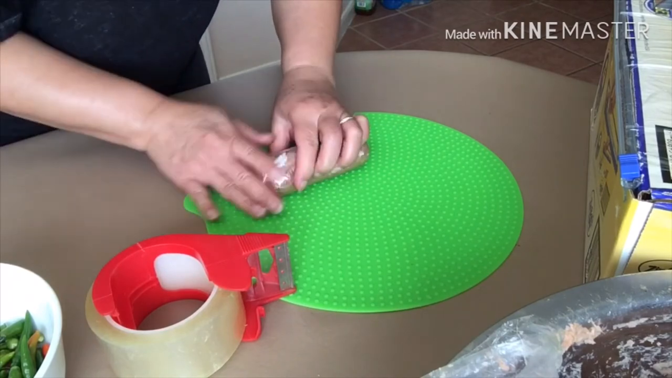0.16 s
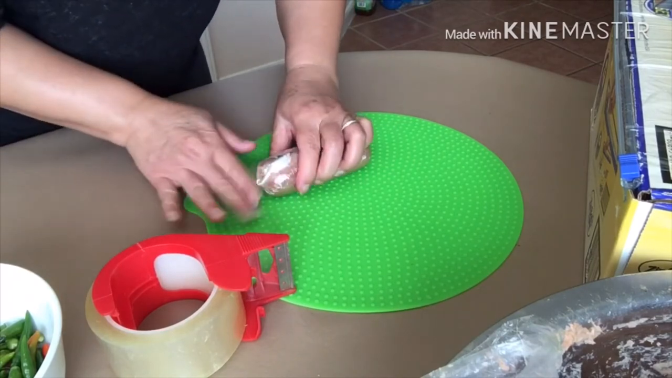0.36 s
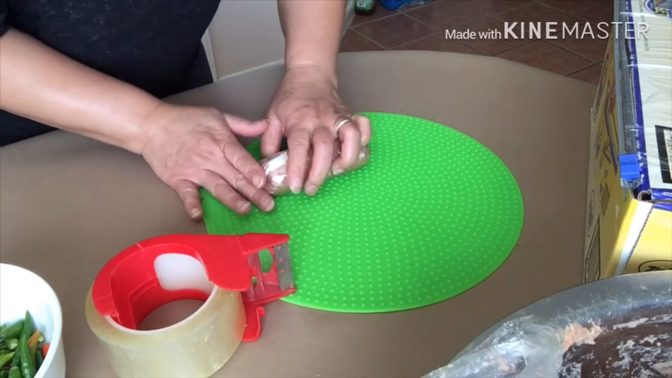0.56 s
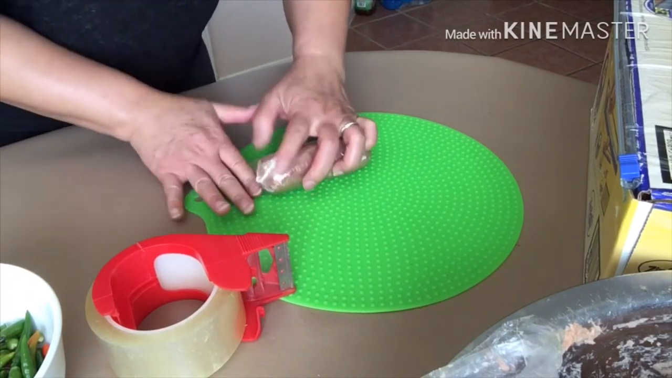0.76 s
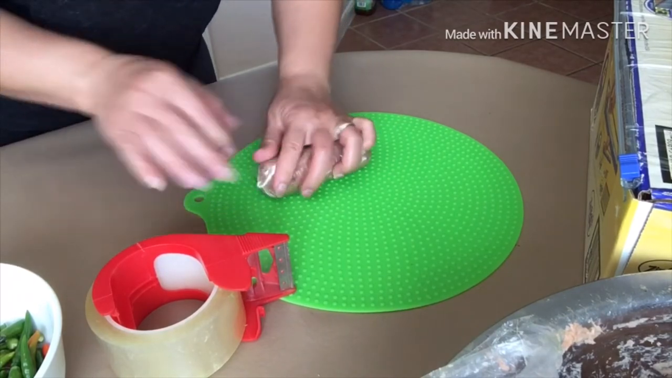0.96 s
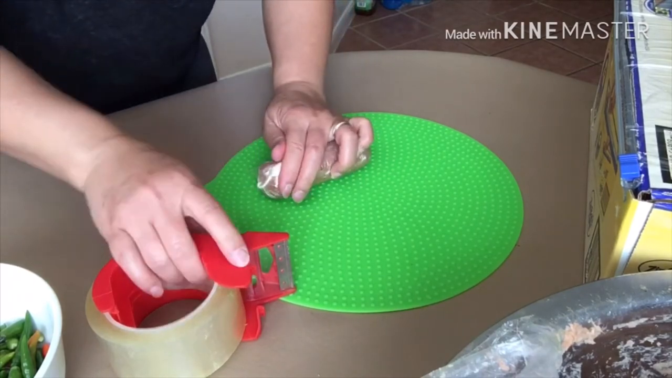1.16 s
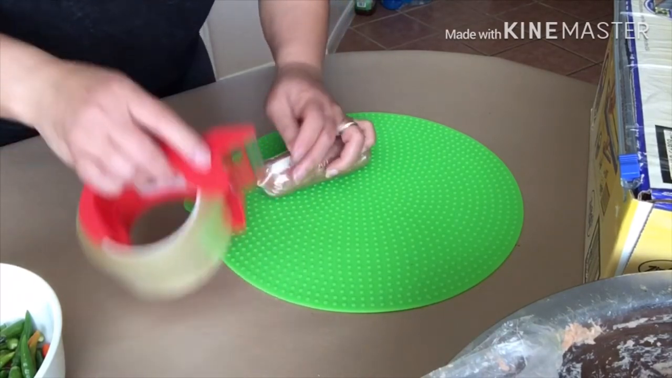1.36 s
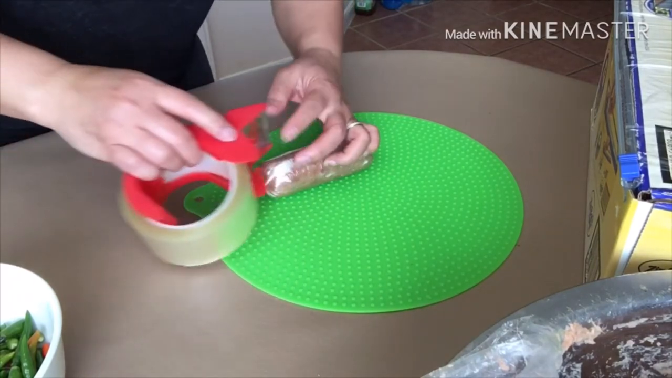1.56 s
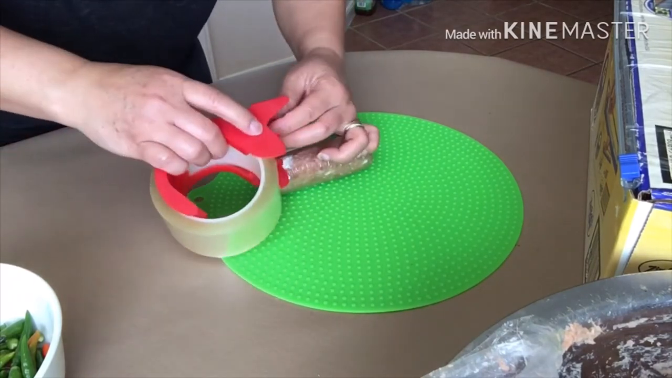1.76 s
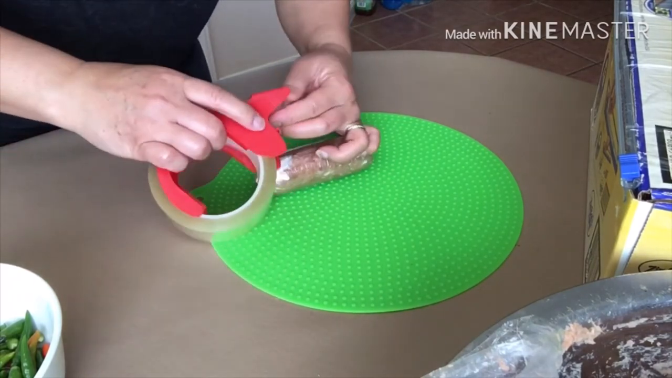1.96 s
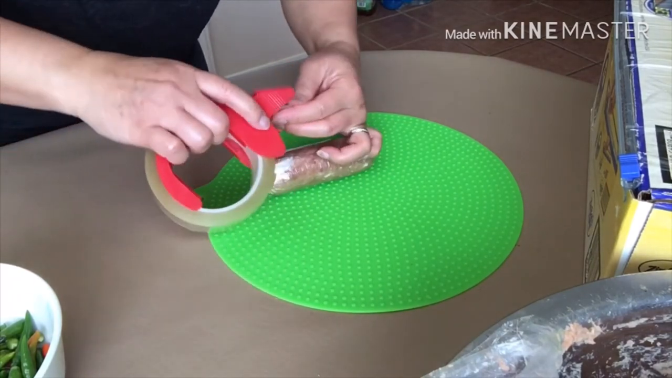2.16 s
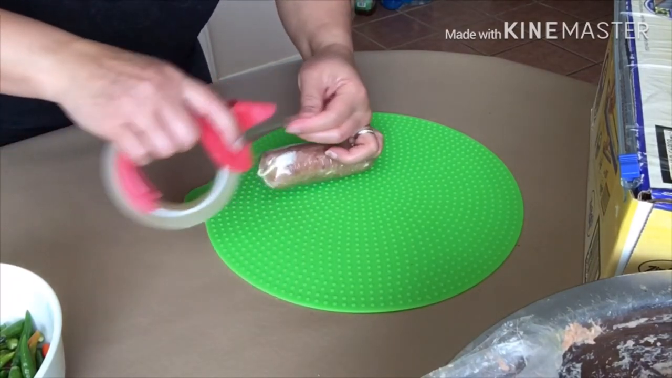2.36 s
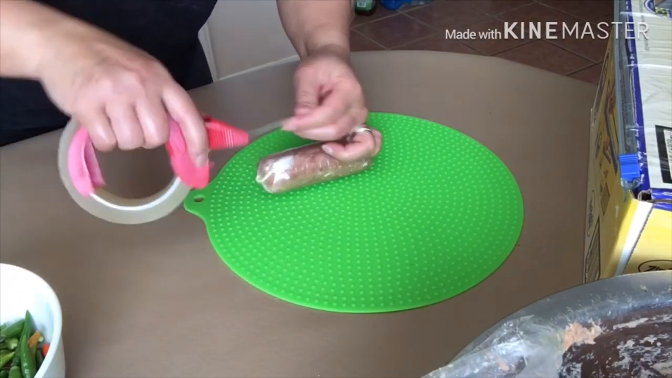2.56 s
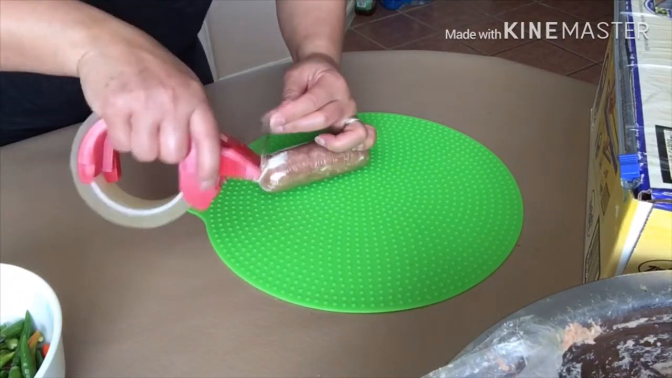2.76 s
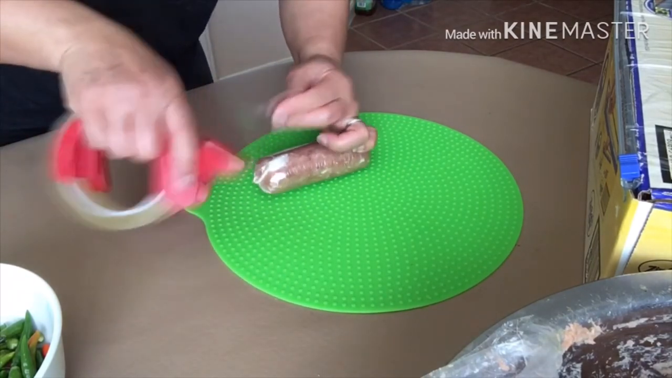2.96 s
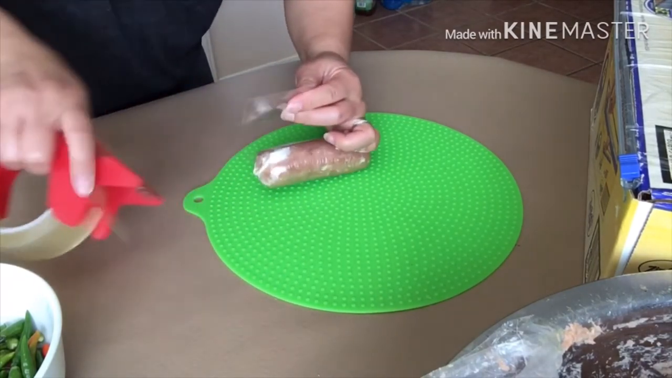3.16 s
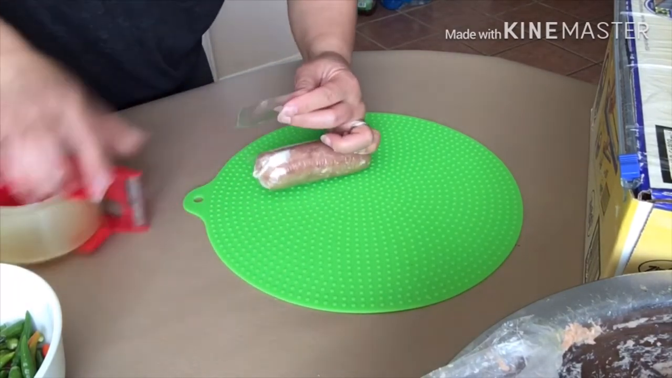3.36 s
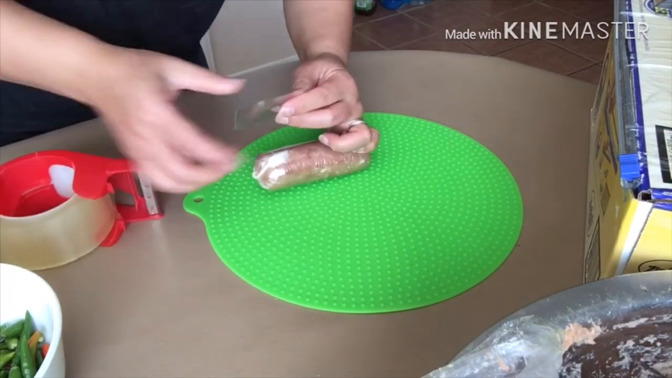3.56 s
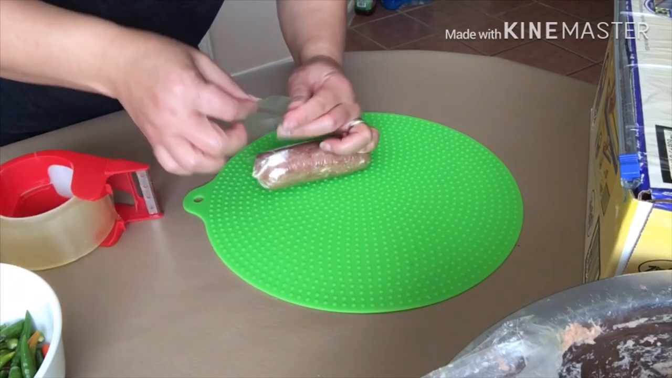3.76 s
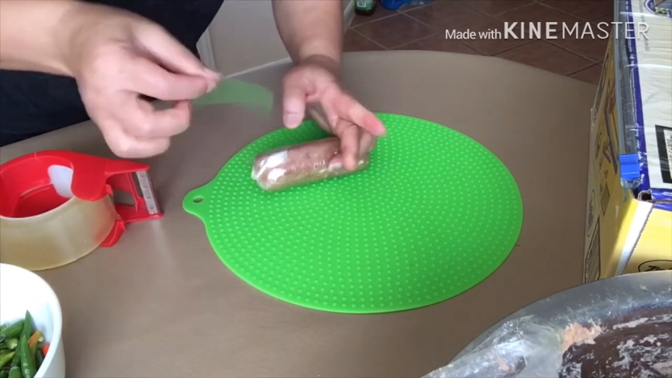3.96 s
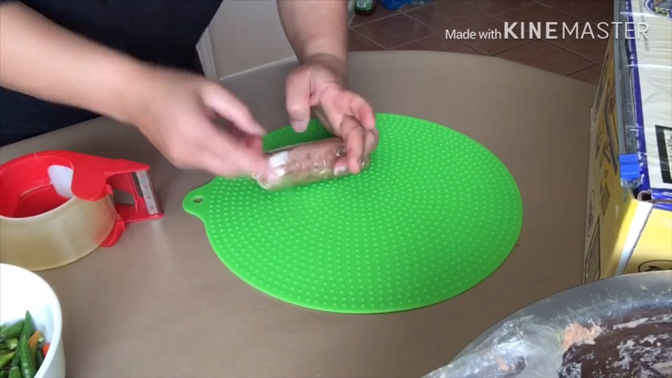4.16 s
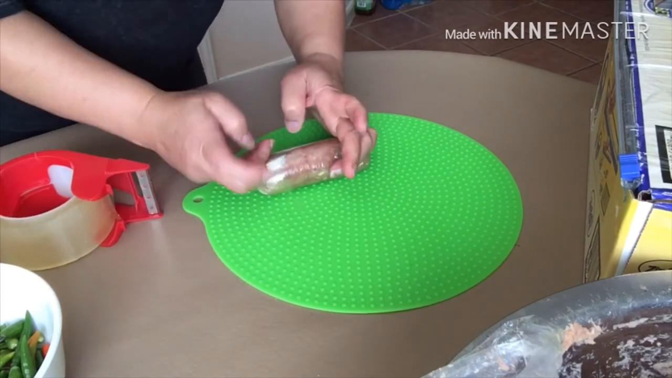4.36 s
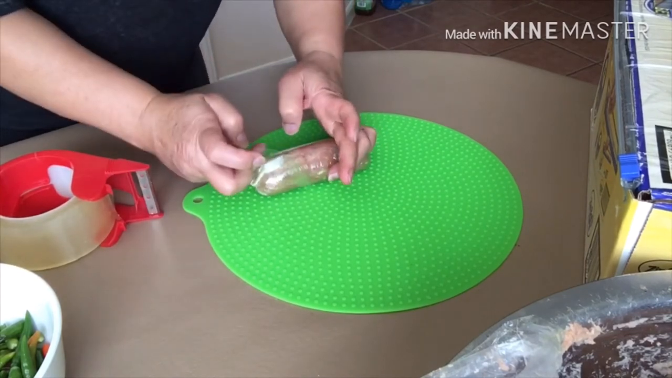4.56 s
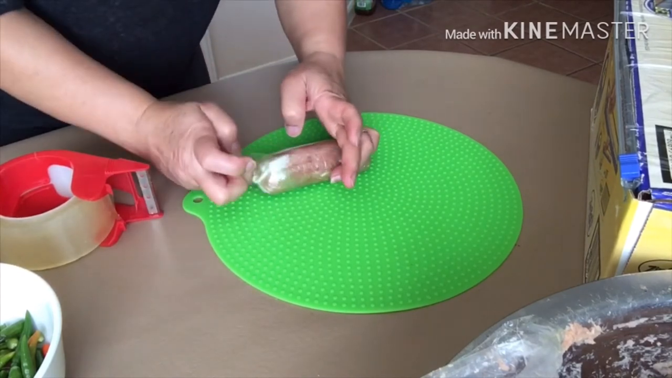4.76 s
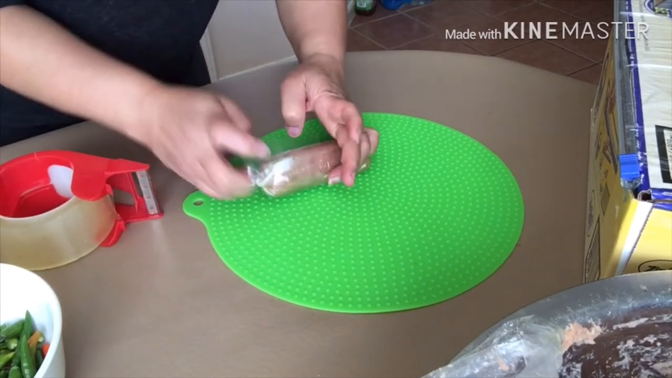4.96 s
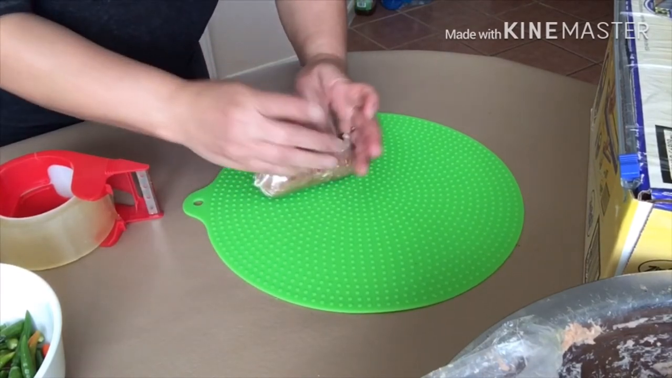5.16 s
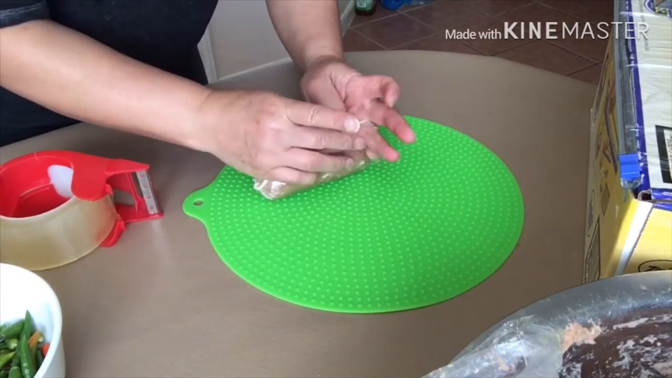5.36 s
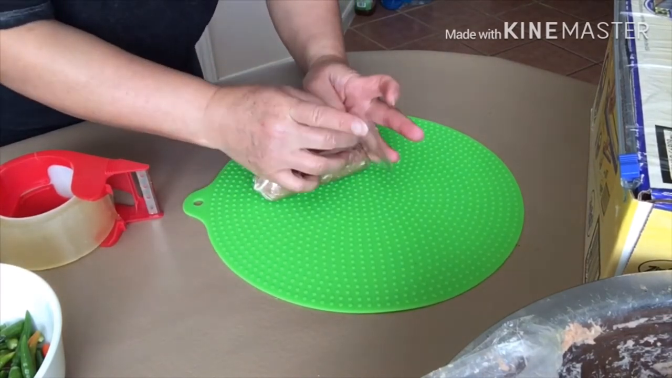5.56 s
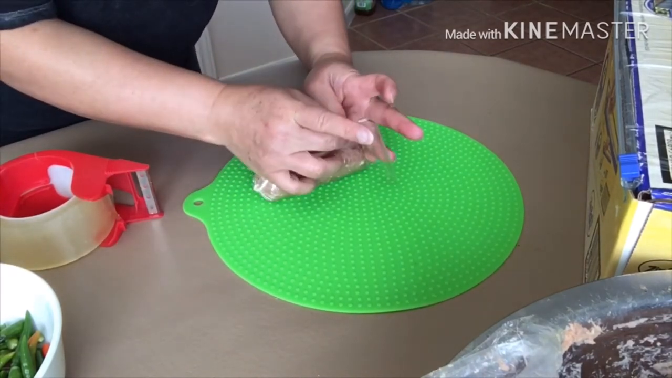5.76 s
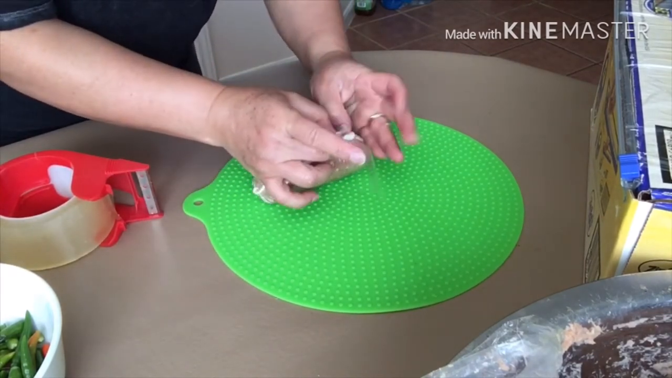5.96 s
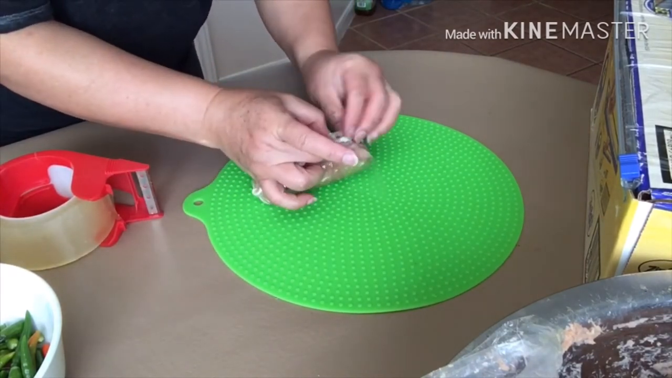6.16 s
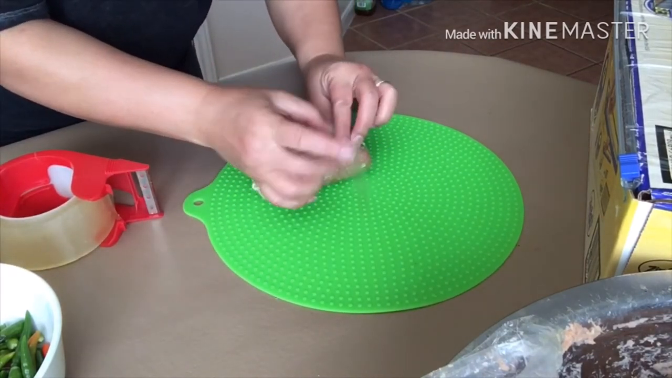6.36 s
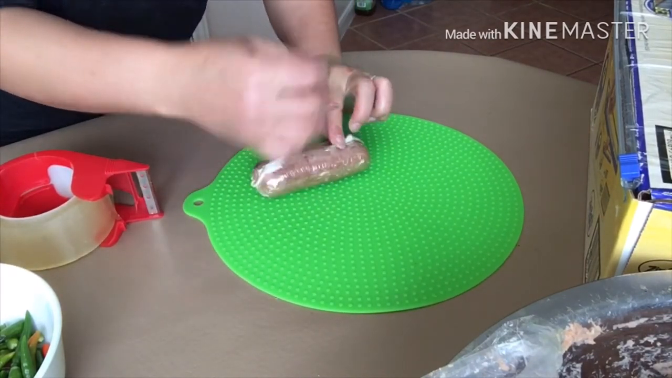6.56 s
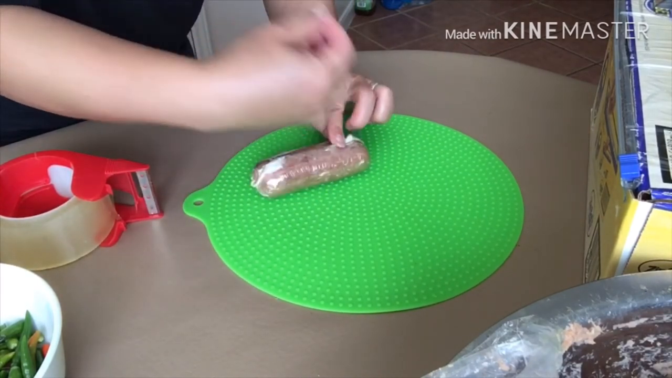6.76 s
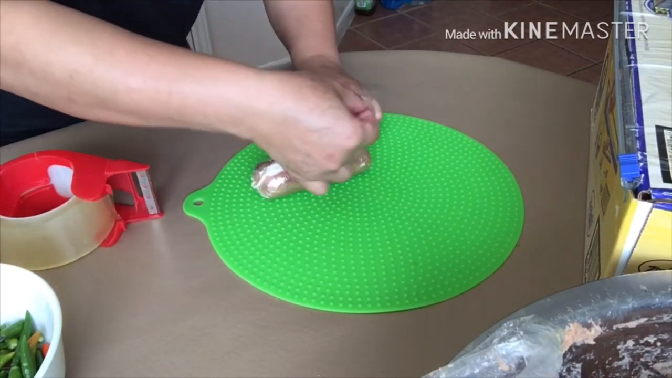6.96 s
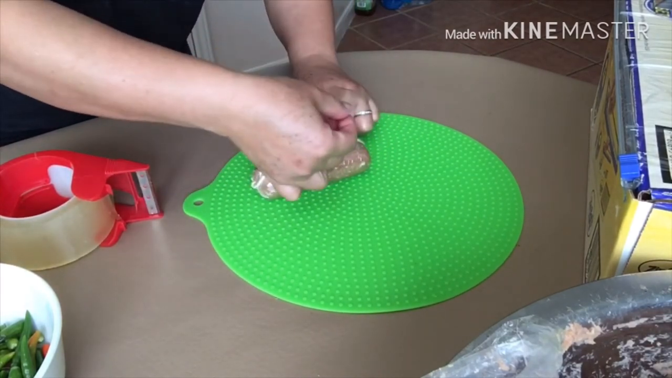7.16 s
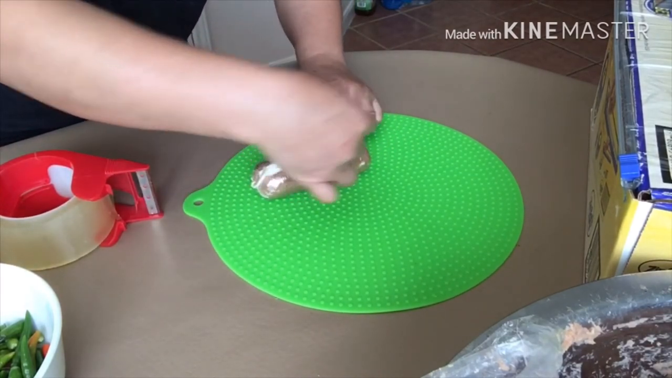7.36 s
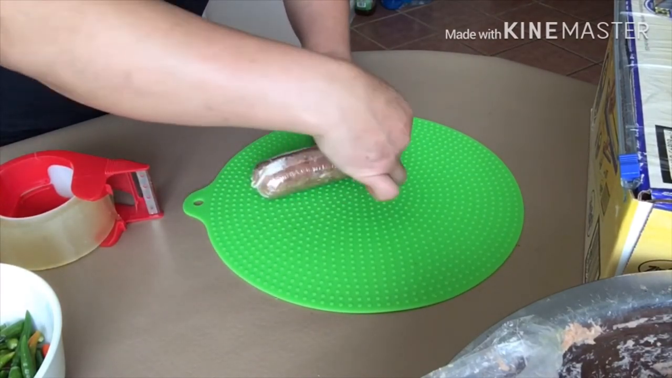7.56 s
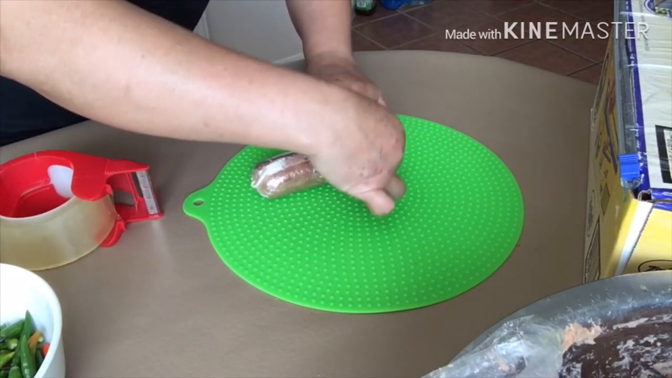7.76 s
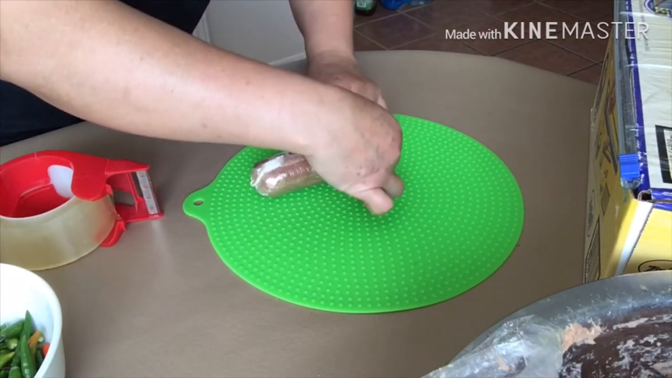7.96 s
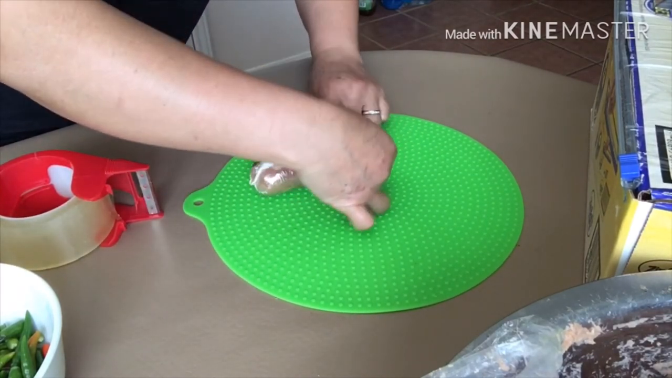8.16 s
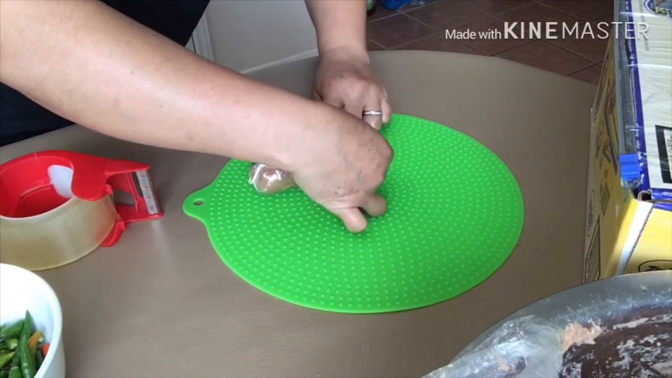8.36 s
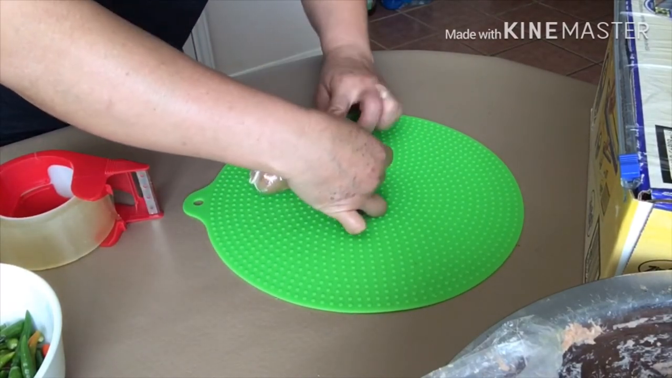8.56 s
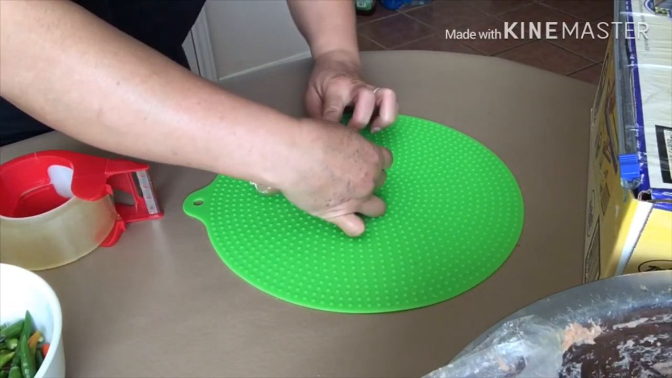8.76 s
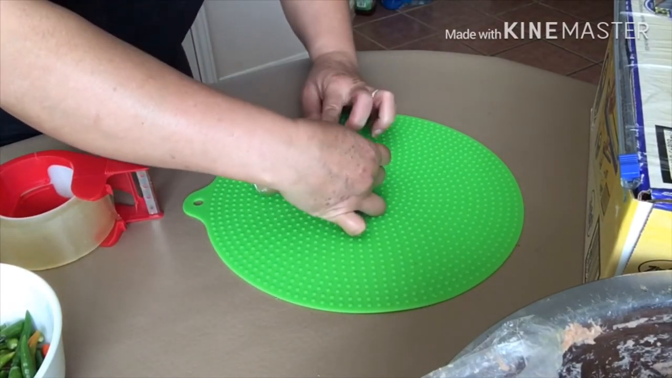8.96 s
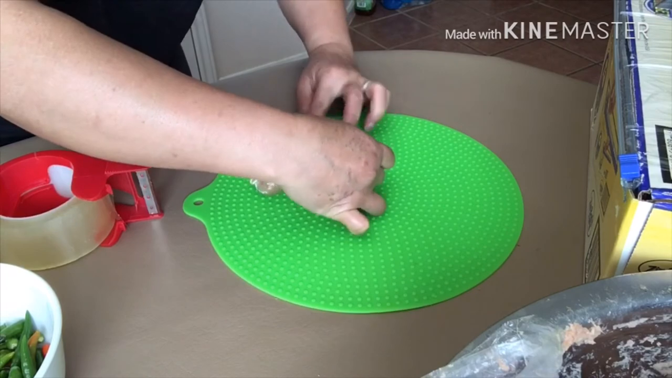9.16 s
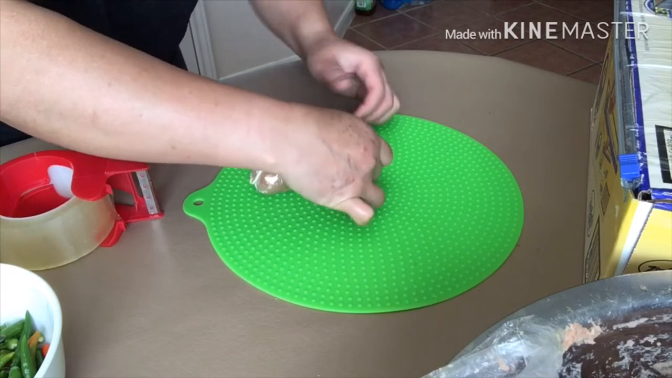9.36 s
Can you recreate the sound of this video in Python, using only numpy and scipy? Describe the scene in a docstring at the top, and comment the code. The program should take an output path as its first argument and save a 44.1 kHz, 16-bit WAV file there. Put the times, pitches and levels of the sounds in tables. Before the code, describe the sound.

Over a low household rumble, thin film pops lightly and is softly tapped. Loud stuttering tape peels burst out, bright and dry, ending in hard snaps. A plastic dispenser thumps on the tabletop, the loose strip crackles sharply, and then light irregular crinkling continues with near-quiet gaps and a busier patch at the end. Closely miked, with a brief room ring.

```python
"""Tape pulled and cut over plastic wrap

Hands smooth plastic wrap on a kitchen table, lift a tape dispenser, pull tape off the roll in
stick-slip jerks, cut it on the teeth, set the dispenser down and stick the strip on the wrap.
Slips and creases are filtered random clicks, blows are sums of dying modes, and the fine rustle
is filtered noise. A small hard room rings shortly behind each crack, over a low household rumble."""
import sys
import numpy as np
from scipy import signal
from scipy.io import wavfile
from scipy.ndimage import uniform_filter1d

SR = 44100
rng = np.random.default_rng(int(sys.argv[2]) if len(sys.argv) > 2 else 0)


def store_pcm(level_fs):
    """Save levels as 16-bit WAV."""
    pcm = np.round(np.clip(level_fs, -1, 1) * 32767).astype(np.int16)
    wavfile.write(sys.argv[1], SR, np.atleast_2d(pcm).T)


N = 415863
HZ = np.fft.rfftfreq(4096, 1 / SR)  # bins on which filter gains are given
LEAD_S = .002  # build-up before a snap

# Fine crackle and rustle throughout, including the dying room tail after the tape pulls and the hard blow.
# Each row: time in seconds, level in dB, gain above about 6 kHz in dB.
FINE_RUSTLE = [(0.0, -59, 4), (0.47, -66.5, 4.5), (1.43, -58.5, -3), (1.56, -72, 3), (1.85, -67, -3),
               (2.23, -49, -2.5), (2.92, -47, -2.5), (3.17, -54.5, 0), (3.37, -54.5, -4), (3.5, -34.5, -5),
               (3.67, -57, -4), (4.15, -59.5, -5), (4.59, -74.5, 4.5), (4.79, -68, 4), (5.18, -65.5, 0),
               (6.15, -74.5, 1), (6.45, -73, 10.5), (7.04, -81, -26), (7.7, -77, -6), (8.01, -67.5, -3),
               (8.6, -72.5, -1.5), (8.78, -64.5, -4), (9.1, -58.5, -0.5), (9.43, -64.5, 2)]


def gain_of(db):
    """Amplitude ratio: 20 dB is a factor of ten."""
    return 10 ** (np.asarray(db) / 20)


def evened(x):
    """Normalisation by signal power: scales to rms 1."""
    return x / np.sqrt(np.mean(x ** 2) + 1e-20)


def read(points, hz):
    """Spectral interpolation: reads a (frequency, value) table along log frequency."""
    f, value = np.transpose(points)
    return np.interp(np.log(hz + 1), np.log(f + 1), value)


def add(mix, s, sound):
    """Superposition: mixes a sound in at time s."""
    part = mix[round(s * SR):][:len(sound)]
    part += sound[:len(part)]


def colour(x, db):
    """Minimum-phase filtering: the phase is the Hilbert transform of the log gain on the HZ bins."""
    log_gain = np.log(gain_of(np.maximum(db, -100)))
    both_sides = np.concatenate([log_gain, log_gain[-2:0:-1]])
    spectrum = np.exp(np.conj(signal.hilbert(both_sides)))
    taps = np.fft.ifft(spectrum).real[:1024]
    return signal.oaconvolve(x, taps)[:len(x)]


def clicks(length, per_s, spread_db):
    """Random impulse process: clicks of either sign at chance moments; a few are large."""
    chance, side = rng.random((2, length))
    size = gain_of(spread_db * np.minimum(rng.exponential(1, length), 4))
    return size * np.sign(side - .5) * (chance < per_s / SR)


def pull(rows):
    """Stick-slip: the glue lets go thousands of times a second, in clumps, and drums on the taut strip."""
    # Adhesive rasp. Each row: frequency in Hz, relative level in dB per Hz.
    peel_spectrum = [(88, -49), (150, -18), (457, -6), (1120, -13.5), (1760, -2), (2650, -6.5), (2980, -12),
                     (3550, -5), (6020, -3), (10600, -14), (13700, -13.5), (16000, -23.5)]
    strip_hz, strip_width_hz = 3110, 400
    s, level_db, drum_db = np.transpose(rows)
    t = np.arange(s[0], s[-1], 1 / SR)
    clumps = evened(uniform_filter1d(rng.standard_normal(len(t)), 90))
    slips = clicks(len(t), 4100, 1.0) * gain_of(2.5 * clumps)
    rasp = evened(colour(slips, read(peel_spectrum, HZ)))

    # the taut strip is a two-pole resonator driven by the same slips
    r = np.exp(-np.pi * strip_width_hz / SR)
    poles = [1, -2 * r * np.cos(2 * np.pi * strip_hz / SR), r * r]
    drum = evened(signal.lfilter([1, 0, -1], poles, slips))
    sound = rasp + gain_of(np.interp(t, s, drum_db)) * drum

    onset, release = (t - s[0]) / 0.0014, (s[-1] - t) / 0.0029  # ramps in s
    ends = np.minimum(np.minimum(onset, release), 1)
    return s[0], gain_of(np.interp(t, s, level_db)) * evened(sound) * ends


def jerk(start, length, start_db, end_db, drum_db):
    """Driven friction: the level slides while the hand drags, then the glue grips again."""
    let_go_s, let_go_db = .008, -12
    end = start + length
    return pull([(start, start_db, drum_db),
                 (end, end_db, drum_db),
                 (end + let_go_s, end_db + let_go_db, drum_db)])


def pulls():
    """Intermittent adhesion: the tape comes unstuck in separate jerks."""
    # Jerks of the tape. Each row: start in seconds, length in seconds, level at start in dB,
    # level at end in dB, drumming of the taut strip relative to the rasp in dB.
    tape_jerks = [(2.37, .017, -14.5, -16, -3), (2.41, .012, -16, -17.5, -4), (2.423, .014, -12, -11.5, -1),
                  (2.436, 0.038, -18, -16, -5.5), (2.487, 0.045, -14.5, -17, -5.5),
                  (2.784, .05, -33, -34.5, -6), (2.84, 0.036, -21.5, -27.5, -1.5),
                  (2.871, .035, -17.5, -32, -6), (3.859, 0.069, -45.5, -37.5, -11),
                  (3.932, .03, -44.5, -21.5, -17), (3.965, .012, -22.5, -39.5, -19)]
    out = np.zeros(N)
    for row in tape_jerks:
        add(out, *jerk(*row))
    return out


def snap(db, hz, treble_db, low_db, t60, width=.5, lift_db=8):
    """Impulsive release: a quick build-up, one sharp release and a dying swarm, brightest where the film rings."""
    t = np.arange(3000) / SR - LEAD_S
    shape = np.where(t < 0, gain_of(11000 * t), gain_of(-60 * t / t60))
    slips = evened(clicks(3000, 8000, 3))
    swarm = .45 * slips * shape
    swarm[round(LEAD_S * SR)] = 2.8  # the sharp release

    slope = read([(200, low_db - 11.5), (800, low_db), (1800, -5), (6500, 1.5 + 0.41 * treble_db),
                  (11500, treble_db), (16000, treble_db - 4)], HZ)
    peak_db = lift_db + 2.2 * np.log2(4000 / hz)  # large slack panels ring lower and purer
    octaves_off = np.log2((HZ + 1) / hz)
    resonance = peak_db * np.exp(-(octaves_off / width) ** 2)
    sound = colour(swarm, slope + resonance)
    envelope = abs(signal.hilbert(sound))
    return gain_of(db) * sound / envelope.max()


def snaps(rows, low_db, t60):
    """Size and pitch: the higher a snap rings, the thinner it is; low_db holds for one ringing at 4 kHz."""
    low_db_per_octave = -6  # small tight creases ring high and thin
    out = np.zeros(N)
    for s, db, hz, treble_db in rows:
        octaves = np.log2(hz / 4000)
        add(out, s - LEAD_S, snap(db, hz, treble_db, low_db + low_db_per_octave * octaves, t60))
    return out


def cracks():
    """Sudden release of stored strain: single slips of the glue, cutter teeth and dispenser clicks."""
    # Single cracks. Each row: time in seconds, peak level in dB, brightest frequency in Hz,
    # spectral level at 11.5 kHz in dB.
    crack_events = [(1.7548, -41, 2720, -33), (1.8084, -36, 2750, -19), (1.8138, -30, 3600, -37),
                    (1.8537, -36, 1520, -31), (1.9222, -24, 8300, -4), (1.9272, -32.5, 4600, -24),
                    (2.0152, -27.5, 3053, -8.5), (2.0242, -21, 3100, -15.5), (2.0284, -14.5, 4060, -15.5),
                    (2.0948, -7, 6223, -10.5), (2.12, -15, 3140, -20), (2.1287, -25, 1938, -25),
                    (2.1769, -3, 2956, -12.5), (2.2189, -2.5, 6140, -14.5), (2.3668, -23, 3074, -20),
                    (2.3719, -1, 3168, -16), (2.4106, -3, 7274, -8.5), (2.4153, -2, 4910, -7.5),
                    (2.4172, -3, 6764, -9.5), (2.4224, -0.5, 3077, -14), (2.6426, -21.5, 2744, -16),
                    (2.667, -27.5, 6500, -24.5), (2.696, -31.5, 3503, -13.5), (2.704, -29.5, 900, -26),
                    (2.7502, 0, 3800, -12.5), (2.754, -2.5, 3940, -12.5), (2.7607, 3, 3678, -14.5),
                    (2.7647, 1.5, 3657, -17.5), (2.7669, -6, 3767, -16), (2.7731, -1, 3920, -11),
                    (3.065, -26, 3496, -27.5), (3.0734, -1, 3656, -19), (3.0771, -3.5, 3754, -17),
                    (3.1029, -19, 3630, -21), (3.2694, -20.5, 6240, -12.5), (3.2944, -24.5, 7060, -3),
                    (3.2982, -17, 3620, -11.5), (3.3008, -18, 4180, -15.5), (3.3148, -24, 3605, -19),
                    (3.3751, -14.5, 3200, -29), (3.3777, -12, 3290, -26), (3.381, -12.5, 3360, -22.5),
                    (3.3854, -11.5, 2383, -22.5), (3.3878, -13.5, 2437, -22), (3.4125, -13.5, 5950, -23.5),
                    (3.426, -14, 1163, -22), (3.4313, -1.5, 3300, -18), (3.4499, -10.5, 3230, -20),
                    (3.5326, -14.5, 2920, -25), (3.5392, -16, 1184, -23), (3.6441, -28, 2300, -18),
                    (3.6731, -24, 1100, -16), (3.7873, -30.5, 3500, -16), (3.8378, -27.5, 2590, -21.5),
                    (3.8484, -22, 2976, -16), (3.8628, -16, 3000, -11), (3.918, -36, 3800, -18),
                    (3.9463, -12, 2410, -6), (3.9558, -7, 5230, -17), (3.9607, -2, 3073, -4.5),
                    (3.9712, -7, 2200, -17.5)]
    return snaps(crack_events, low_db=-12, t60=.028)


def ticks():
    """Random weak events: faint creases at chance moments, their level following the rustle up to a cap."""
    count, over_db, range_db, cap_db = 45, 19, 6, -60
    when, pitch, size, shine = rng.random((count, 4)).T
    s = .01 + when * (N / SR - .02)
    rustle_db = np.interp(s, *np.transpose(FINE_RUSTLE)[:2])
    db = np.minimum(rustle_db, cap_db) + over_db + range_db * size
    return zip(s, db, 3000 * 2.5 ** pitch, -14 + 14 * shine)


def creases():
    """Snap-through buckling: creases of the plastic wrap pop, with faint chance ticks among them."""
    # Popping creases. Each row: time in seconds, peak level in dB, brightest frequency in Hz,
    # spectral level at 11.5 kHz in dB.
    crease_events = [(.0826, -32, 3550, -30.5), (.1117, -41, 2910, -27), (.1728, -23, 3530, -13),
                     (.1909, -21, 4000, 0), (.2751, -14.5, 3060, -12), (.3082, -24, 5930, -11),
                     (.391, -21.5, 3700, -11), (.4554, -26.5, 3640, -2), (.4838, -30, 4350, 2),
                     (.5187, -42, 6760, -20), (.5794, -20.5, 3700, -9.5), (.657, -32, 920, -30),
                     (.7196, -37, 5900, 1), (.8148, -40, 1840, -41), (.8746, -17, 2670, -15),
                     (.9254, -39, 3850, -13), (.9864, -22, 5800, -6), (.9904, -21.5, 5750, -21),
                     (.9956, -18, 2450, -17), (1.2299, -34, 2030, -31), (1.2809, -28, 1920, -18),
                     (1.3466, -16.5, 1850, -20.5), (1.3739, -26.5, 3640, -15), (1.5247, -42, 5810, -10),
                     (1.5742, -37, 5470, -21), (4.0909, -27, 3920, -26), (4.1556, -38.5, 1900, -36),
                     (4.2208, -32, 4240, -58), (4.3641, -42, 5940, -14), (4.4191, -33, 6040, -16),
                     (4.4479, -25.5, 4470, -14), (4.5692, -38, 6050, 10), (4.7063, -13.5, 6320, 3),
                     (4.715, -32, 6400, 3), (4.771, -21, 8980, 0), (4.8876, -36.5, 934, -49),
                     (4.9376, -29.5, 2800, -18), (5.0837, -24, 3300, 1), (5.1155, -37.5, 6890, 3),
                     (5.2031, -38.5, 3040, -45), (5.2495, -38, 3660, 2), (5.2942, -24.5, 5800, -19),
                     (5.4264, -41, 5840, -10), (5.5178, -40, 5550, -14), (5.7741, -33, 4280, -4),
                     (5.9538, -37.5, 7170, -11), (6.1856, -40.5, 7080, 0), (6.3346, -37, 3560, -4),
                     (6.4629, -34, 5900, -1), (6.5093, -34, 3290, -9), (6.5166, -23, 3080, -7),
                     (6.6066, -42.5, 7300, -12), (6.6826, -33, 4580, -26), (6.6903, -37.5, 2500, -42),
                     (6.6975, -26.5, 4400, -31), (6.8646, -34.5, 4000, -42), (6.9021, -32, 1080, -35.5),
                     (6.9644, -44, 1645, -31.5), (7.3817, -45, 5230, -15), (7.9046, -35.5, 2650, -44),
                     (7.9144, -38, 3850, -19), (7.9526, -27.5, 1310, -25), (8.1961, -23, 5900, -17),
                     (8.218, -27, 1100, -19), (8.2371, -30.5, 5920, -25), (8.2585, -37.5, 1340, -21),
                     (8.3417, -35, 6050, -14), (8.3724, -42, 5990, -11), (8.5213, -45, 6460, -20),
                     (8.6544, -39, 6100, -10), (8.6611, -35, 7330, -3), (8.7098, -41, 5970, -15),
                     (8.786, -42, 7030, -7), (8.8322, -29.5, 7470, -10), (8.8527, -21.5, 4460, -20),
                     (8.8873, -23, 8860, -18), (8.9553, -30, 1370, -21), (8.9829, -32.5, 1430, -24),
                     (8.9939, -23, 4200, -20), (9.0187, -19, 1530, -8), (9.1071, -16, 1830, -17.5),
                     (9.1158, -35, 5230, -23), (9.1241, -22.5, 5920, -8), (9.173, -25, 5920, -25),
                     (9.1772, -19.5, 1190, -20), (9.1982, -26.5, 1370, -37), (9.2515, -29.5, 1260, -45),
                     (9.3351, -35, 1160, -47)]
    return snaps([*crease_events, *ticks()], low_db=-18.5, t60=.019)


def crinkle(rows, per_s, slide, patchy_db):
    """Crackling noise: short puffs, each in its own band, over an unevenly drifting rustle."""
    # Rustling film. Each row: frequency in Hz, gain in dB.
    film_spectrum = [(290, -46), (500, 6.5), (795, -13), (1140, -2), (2330, -7.5), (2770, -2.5), (3920, -6),
                     (4340, -7), (13100, -18), (16000, -21)]
    s, level_db, treble_db = np.transpose(rows)
    t = np.arange(s[0], s[-1], 1 / SR)
    film = np.zeros(len(t))
    for hz in (900, 1500, 2400, 3900, 6300, 10000, 15500):
        puffs = 5 * signal.lfilter([1], [1, -.975], abs(clicks(len(t), per_s, 3)))
        drift = evened(signal.lfilter([1], [1, -.9994], rng.standard_normal(len(t))))
        strength = puffs + slide * gain_of(patchy_db * drift)
        grain = strength * rng.standard_normal(len(t))
        film += signal.lfilter(*signal.butter(2, [hz / 1.3, hz * 1.3], "band", fs=SR), grain)
    film = evened(colour(film, read(film_spectrum, HZ)))

    low = signal.lfilter(*signal.butter(2, 6000, fs=SR), film)
    film = low + gain_of(np.interp(t, s, treble_db)) * (film - low)
    fades = signal.windows.tukey(len(t), 400 / len(t))
    return s[0], gain_of(np.interp(t, s, level_db)) * film * fades


def scrunch(start, length, db, treble_db):
    """Superposed crackling: a dense burst of crinkle that fades by 3 dB."""
    rows = [(start, db, treble_db), (start + length, db - 3, treble_db)]
    return crinkle(rows, per_s=100, slide=3.5, patchy_db=3)


def scrunches():
    """Burst emission: short scrunches of the wrap."""
    # Scrunches. Each row: start in seconds, length in seconds, level in dB, gain above about 6 kHz in dB.
    wrap_bursts = [(0.167, 0.031, -51, 3), (0.292, .053, -56.5, 12), (0.47, 0.032, -57, 9),
                   (.88, 0.066, -49, -2.5), (0.963, 0.086, -50.5, -0.5), (1.215, 0.031, -47, -3.5),
                   (1.304, 0.096, -54, 2), (4.131, .04, -60, -14), (4.451, .09, -70, 10.5),
                   (4.722, 0.14, -68.5, 10), (5.064, 0.035, -53.5, 6), (5.298, .08, -64.5, 7.5),
                   (5.625, 0.12, -72.5, -14), (5.762, 0.025, -60, 5), (6.25, 0.057, -68, -6),
                   (6.423, 0.094, -62, 1), (6.952, .04, -65, -10), (7.247, 0.072, -65, -7),
                   (7.943, 0.03, -43, -2), (9.135, 0.021, -39.5, -5), (9.174, 0.038, -39, -6.5)]
    out = np.zeros(N)
    for row in wrap_bursts:
        add(out, *scrunch(*row))
    return out


def ring(modes, rise_s):
    """Modal synthesis: a sum of exponentially dying modes, each struck with its own strength."""
    t = np.arange(9000) / SR
    out = np.zeros(len(t))
    for hz, db, t60 in modes:
        struck_db = db + 1.5 * rng.standard_normal()
        out += gain_of(struck_db - 60 * t / t60) * np.sin(2 * np.pi * hz * t)
    out = out * (1 - np.exp(-t / rise_s))
    return out / abs(out).max()


def thuds():
    """Impact excitation: the table top booms a little late; hard blows also ring the hollow spool."""
    # Blows on the table. Each row: time in seconds, peak level of the boom in dB,
    # hardness as the level of the spool relative to the boom in dB.
    blow_events = [(0.187, -46, -25.5), (0.657, -41, -2), (0.878, -29, 8), (1.25, -48, -11),
                   (1.346, -50, 19.5), (3.378, -17.5, -25), (3.392, -25.5, -24.5), (3.4312, -15.5, 14.5),
                   (3.451, -24, -9), (3.472, -26.5, -8), (3.539, -38.5, 18), (8.6, -46, -0.5)]
    # Modes of the table top, then of the spool. Each row: frequency in Hz, level in dB, t60 in seconds.
    table_modes = [(114.1, 3.5, 0.07), (168, 2.5, 0.09), (233, -1, .06), (338, -4.5, 0.042),
                   (428, -7.5, 0.039), (600, -12.5, .03)]
    spool_modes = [(930, 1, 0.047), (1210, 9.5, 0.013), (1430, -5, 0.018)]
    out = np.zeros(N)
    for s, db, hard_db in blow_events:
        add(out, s, gain_of(db + hard_db) * ring(spool_modes, rise_s=0.000043))
        add(out, s + 0.0015, gain_of(db) * ring(table_modes, rise_s=0.0045))
    return out


def room(x):
    """Diffuse reverberation: sparse echoes of random sign, each band dying at its own speed."""
    # Decay of the room. Each row: frequency in Hz, t60 in seconds.
    decay_times = [(200, 0.64), (600, .35), (1500, 0.18), (4000, 0.27), (10000, 0.18)]
    taps = np.zeros(SR // 2)
    at = np.arange(200, SR // 2 - 16, 16)
    taps[at + rng.integers(0, 16, len(at))] = rng.choice([-1., 1.], len(at))
    hz, t, z = signal.stft(taps, SR, nperseg=256)
    decay = gain_of(-60 * t / read(decay_times, hz)[:, None])
    tail = signal.istft(z * decay, SR, nperseg=256)[1]
    return signal.oaconvolve(x, tail / np.linalg.norm(tail))[:N]


def rumble():
    """Stationary coloured noise: random short-time spectra with drifting patches."""
    # Household rumble. Each row: frequency in Hz, relative level in dB per Hz.
    rumble_spectrum = [(12, -46.5), (20, -4.5), (53, -3), (182, 0.5), (241, -1.5), (357, 0.5), (485, -12),
                       (1400, -18.5), (2320, -28.5), (2750, -28), (6910, -34.5), (10200, -41.5),
                       (14300, -41), (16000, -53)]
    rumble_db = -59
    frames, hz = N // 256 + 5, np.fft.rfftfreq(1024, 1 / SR)
    a, b, patches = rng.standard_normal((frames, 513, 3)).T
    patches = uniform_filter1d(patches, 10, 0)  # along frequency
    patches = evened(uniform_filter1d(patches, 14, 1))  # along time
    z = (a + 1j * b) * gain_of(read(rumble_spectrum, hz)[:, None] + .8 * patches)
    noise = signal.istft(z, nperseg=1024, noverlap=768)[1][:N]
    return gain_of(rumble_db) * evened(noise)


def scene():
    """Linear superposition: all near sources, their room, and the rumble."""
    room_db, blow_room_db = -11, -6
    near = pulls() + cracks() + creases()
    add(near, *crinkle(FINE_RUSTLE, per_s=5, slide=.7, patchy_db=2.5))
    near += scrunches()
    blows = thuds()
    # blows travel mostly through the table, so the room gets less of them
    wet = gain_of(room_db) * room(near + gain_of(blow_room_db) * blows)
    return (near + blows + wet + rumble())[None]


def record(dry):
    """Transducer response: a small microphone drops deep bass, dips in the treble, saturates and is band-limited."""
    # Microphone response. Each row: frequency in Hz, gain in dB.
    mic_response = [(6000, -0.5), (8500, -1.5), (10500, -2), (13000, 0.5)]
    edge_hz = 15850
    coloured = colour(dry[0], read(mic_response, HZ))
    thin = signal.sosfilt(signal.butter(2, 45, "high", fs=SR, output="sos"), coloured)
    soft = thin / (1 + (thin / .92) ** 4) ** .25  # loud cracks meet a knee
    band_limit = signal.firwin(511, edge_hz, window=("kaiser", 9), fs=SR)
    return signal.oaconvolve(soft, band_limit, "same")[None]


dry = scene()
out = record(dry)
store_pcm(out)
```